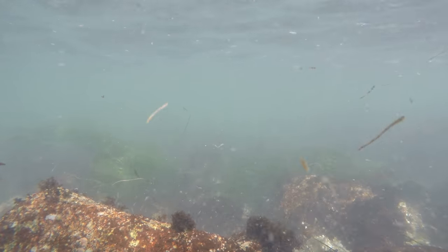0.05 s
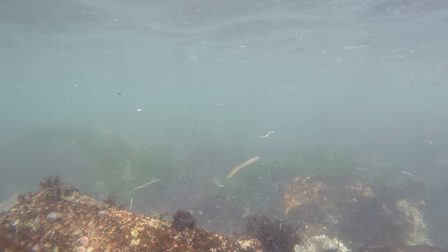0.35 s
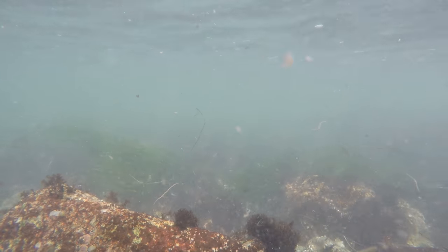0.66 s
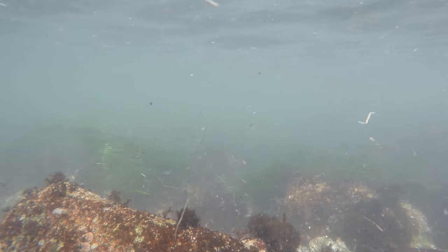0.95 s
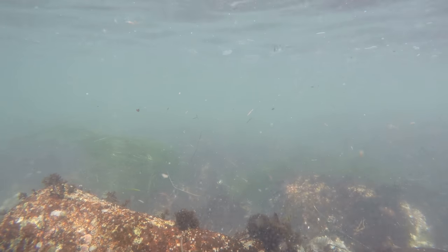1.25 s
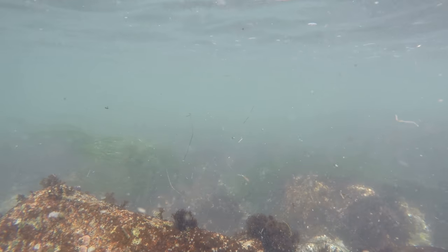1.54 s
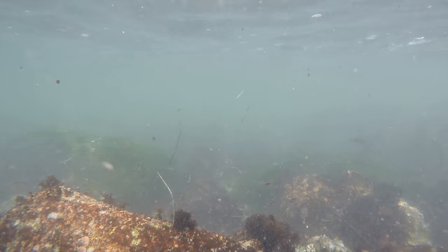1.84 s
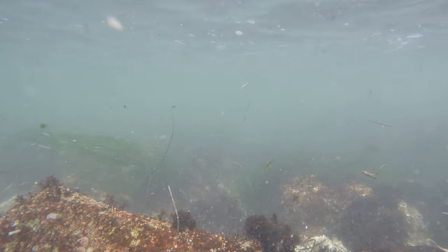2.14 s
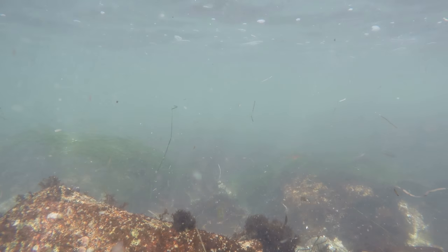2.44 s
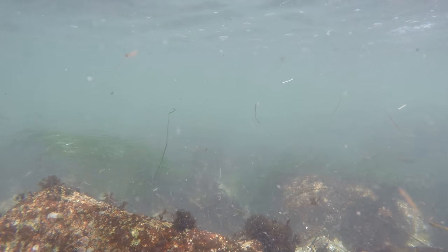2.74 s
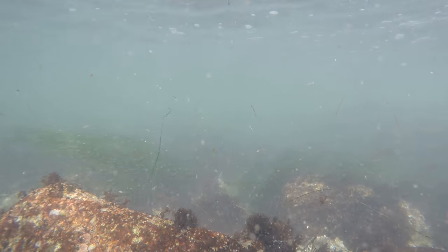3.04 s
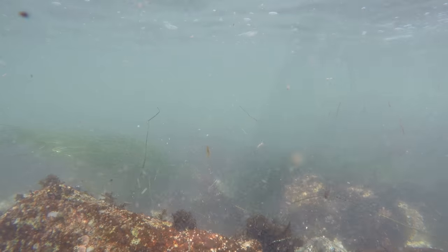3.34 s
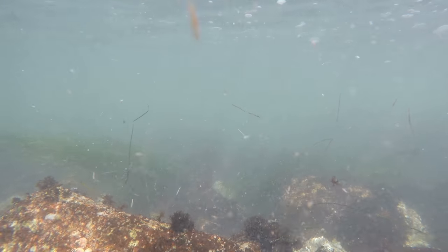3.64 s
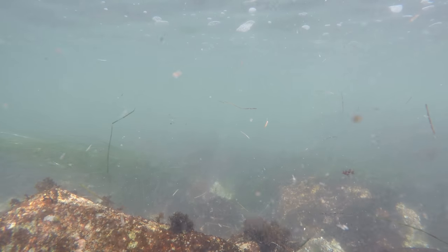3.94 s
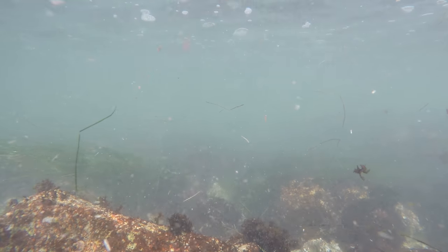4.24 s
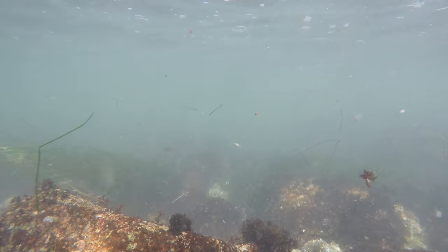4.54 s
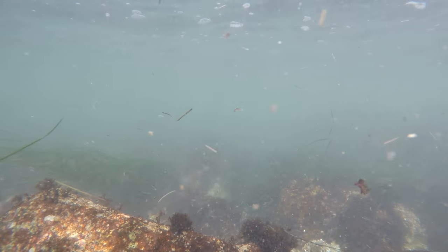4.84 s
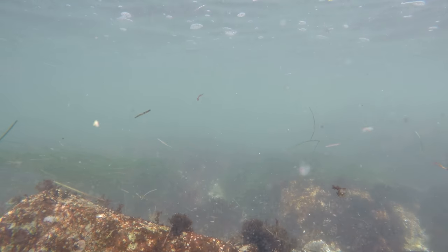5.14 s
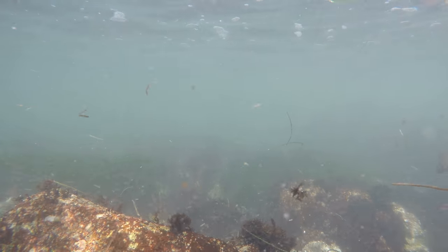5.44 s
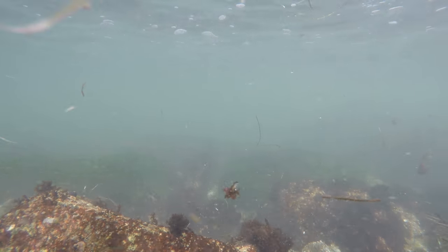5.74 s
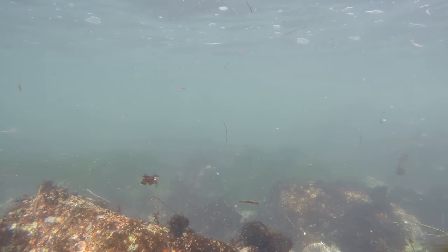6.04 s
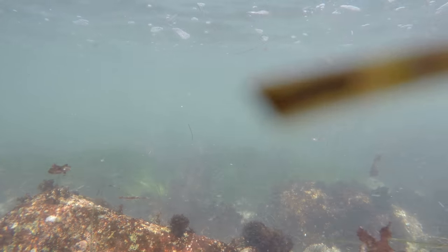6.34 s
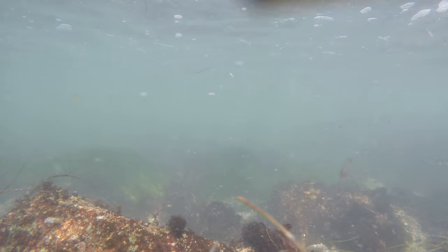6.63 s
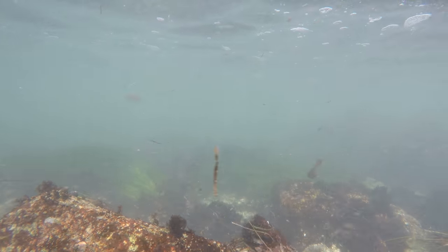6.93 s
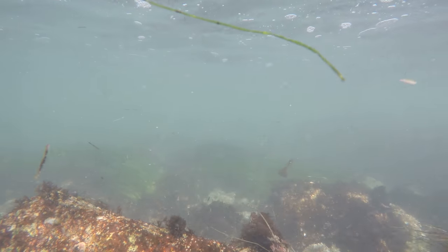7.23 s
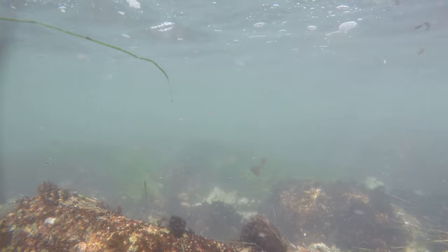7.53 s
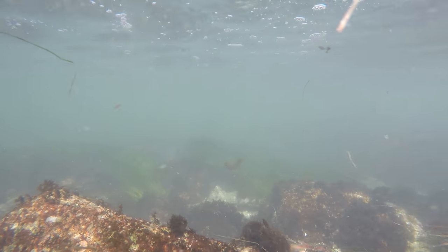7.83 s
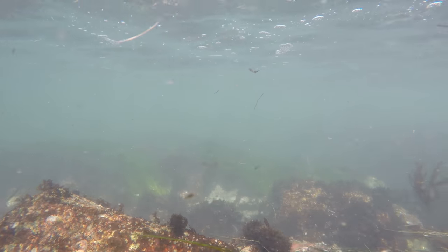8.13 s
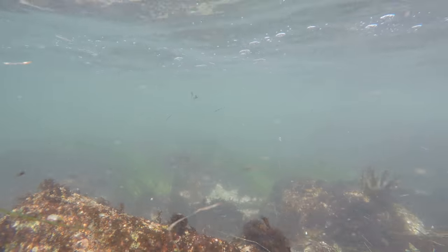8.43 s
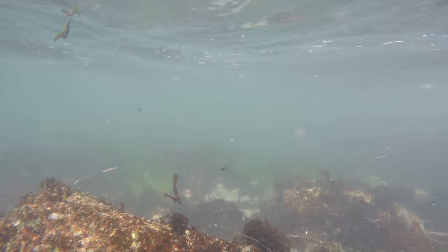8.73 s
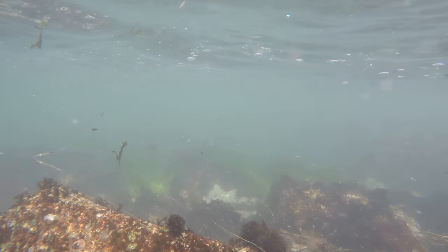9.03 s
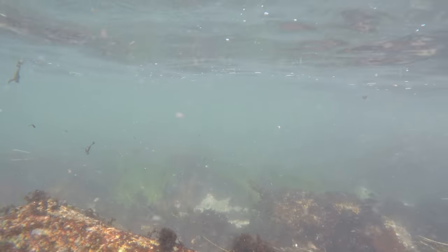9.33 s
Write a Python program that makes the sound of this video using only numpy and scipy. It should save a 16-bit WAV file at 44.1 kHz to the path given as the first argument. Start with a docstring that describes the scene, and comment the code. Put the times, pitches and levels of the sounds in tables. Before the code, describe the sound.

Low underwater surge rumbles with gurgling bubbles and faint ticks, ending in a heavy thud and splash.

```python
"""A camera in a waterproof housing lies just under the surf, above rocks and weed.
The surge rumbles from the start, and a cloud of air bubbles gurgles by, each ringing at the
pitch of its size. In the lull that follows, grit ticks on the housing, fronds brush it and a
faint cloud passes. A dense cloud arrives at 8.3 s; at 9.4 s the surface slaps down on the
housing with a heavy thud and a splash."""
import sys
import numpy as np
from scipy import signal
from scipy.fft import rfft, irfft, next_fast_len
from scipy.io import wavfile
from scipy.ndimage import uniform_filter1d, map_coordinates

SR = 44100
rng = np.random.default_rng(int(sys.argv[2]) if len(sys.argv) > 2 else 0)


def int16_out(signal):
    """Quantize to a 16-bit WAV file."""
    q = np.round(np.clip(np.atleast_2d(signal).T, -1, 1) * 32767)
    wavfile.write(sys.argv[1], SR, q.astype(np.int16))


N = 418068


def amp(db):
    """Decibels to gain."""
    return 10 ** (np.asarray(db) / 20)


def unit(x):
    """Scale to rms 1."""
    return x / np.sqrt(np.mean(x ** 2) + 1e-20)


def automation(points):
    """Straight ramps through (t/s, value) points, one value a sample."""
    return np.interp(np.arange(N) / SR, *np.transpose(points))


def wobble(rate):
    """A smooth random curve, rate knots a second."""
    return map_coordinates(rng.standard_normal(int(N * rate / SR) + 4), [np.arange(N) * rate / SR])


def swell(middle_s, length_s):
    """A smooth rise and fall from 0 to 1 and back."""
    return np.cos(np.pi * np.clip((np.arange(N) / SR - middle_s) / length_s, -.5, .5)) ** 2


def colour(x, eq):
    """Minimum-phase EQ through (f/Hz, level/dB) points, scaled to a power gain of 1."""
    size = 2 * next_fast_len(len(x) // 2 + 4096)
    hz, db = np.transpose(eq)
    log_hz = np.log(np.fft.rfftfreq(size, 1 / SR) + 1)
    gain = unit(amp(np.interp(log_hz, np.log(hz), db)))
    cepstrum = irfft(np.log(gain))
    cepstrum[1:size // 2] *= 2
    cepstrum[size // 2 + 1:] = 0
    return irfft(rfft(x, size) * np.exp(rfft(cepstrum)))[:len(x)]


def noise(eq):
    """Coloured noise of rms 1."""
    return unit(colour(rng.standard_normal(N), eq))


def steady(x, seconds):
    """Even out swells slower than the given time, leaving rms 1."""
    width = max(int(seconds * SR), 2)
    power = uniform_filter1d(uniform_filter1d(x ** 2, width), width)
    return x / np.sqrt(np.abs(power) + 1e-12)


def add(track, s, sound):
    """Mix a sound into a track at time s."""
    start = min(max(round(s * SR), 0), N)
    track[start:start + len(sound)] += sound[:N - start]


def ring(t, hz, t60, glide):
    """A resonance that swells over a cycle or two and bends by the share glide as it dies."""
    phase = 2 * np.pi * hz * (t + glide * (t - t60 / 6 * (1 - np.exp(-6 * t / t60))))
    attack = 1 - np.exp(-(.6 * hz * t) ** 2)
    return np.sin(phase) * attack * amp(-60 * t / t60)


def swarm(rate, centre_hz, spread, cycles, scatter_db, glide, samples):
    """Randomly timed little bubbles; the larger ones are lower and ring longer."""
    count = int(rate * N / SR)
    when, pitch, strength, life, drift = rng.random((count, 5)).T[:, :, None]
    hz = centre_hz * np.exp(spread * (2 * pitch - 1))
    tones = ring(np.arange(samples) / SR, hz, cycles * (.5 + life) / hz, glide * (3 * drift - 1))
    tones *= amp(scatter_db * strength ** 2)
    places = (when * N).astype(int) + np.arange(samples)
    return unit(np.bincount(places.ravel(), tones.ravel(), N)[:N])


def grit(rate, bed):
    """Random tiny impacts on a bed of finer ones."""
    impacts = (rng.random(N) < rate / SR) * rng.standard_normal(N)
    return unit(unit(impacts) + bed * rng.standard_normal(N))


def noise_floor():
    """An even hiss under the faint whine of the camera's electronics."""
    # hiss EQ: f/Hz, level/dB
    hiss_eq = [(100, 5), (300, 4.5), (700, -1.5), (1100, -3), (2700, -7), (3400, -5.5), (4000, -4.5),
               (5000, -7.5), (8000, -12.5), (11500, -14.5), (12400, -11), (13200, -16.5), (15500, -19)]
    # whine tones: f/Hz, rms level/dB
    tones = [(4016, -86.5), (12349, -91)]
    t = np.arange(N) / SR
    whine = sum(amp(db) * np.sqrt(2) * np.sin(2 * np.pi * hz * t + 0.91 * wobble(70))
                for hz, db in tones)
    return amp(-65.0) * noise(hiss_eq) + whine


def surge():
    """The flow and its eddies press on the housing; faster water adds a flutter above the rumble."""
    # slow flow past the housing: t/s, relative level/dB
    current = [(0.0, -44.5), (0.9, -46.5), (1.65, -43), (2.4, -46.5), (3.2, -44.5), (3.95, -45),
               (4.35, -38), (4.7, -46), (5.5, -42), (6.9, -43), (7.15, -42.5), (7.6, -45), (7.95, -39),
               (8.38, -42), (8.6, -37.5), (9.36, -37)]
    # eddies rolling past: middle t/s, relative peak level/dB
    eddies = [(0.17, -38.5), (0.3, -39.5), (0.57, -41.5), (1.25, -38), (1.38, -38), (1.57, -40),
              (2.56, -40), (3.099, -34), (3.71, -39), (4.17, -33.5), (5.34, -37.5), (5.7, -37), (5.96, -35),
              (6.19, -33), (6.39, -35), (6.68, -39), (7.0, -38.5), (7.73, -40.5), (7.91, -35), (8.64, -36),
              (9.03, -33.5), (9.17, -31.5)]
    # rumble EQ: f/Hz, level/dB
    rumble_eq = [(8, -26), (14, 4.5), (28, -0.5), (45, -0.5), (60, -10.5), (90, -22), (180, -34.5),
                 (400, -48.5), (900, -78)]
    eddy_power = sum((amp(db) * swell(s, length_s=0.14)) ** 2 for s, db in eddies)
    flow = np.sqrt(amp(automation(current)) ** 2 + eddy_power)
    rumble = steady(noise(rumble_eq), seconds=0.049)
    flutter = noise([(40, -17), (110, 7.5), (200, -2.5), (400, -23.5), (900, -44)]) * amp(2 * wobble(27))
    return amp(1.28) * flow * rumble + amp(-54.5) * np.sqrt(flow) * flutter


def weed():
    """Drifting fronds rub along the housing in short uneven strokes."""
    # brush strokes: t/s, length/s, level/dB
    brushes = [(2.021, 0.051, -61.5), (2.755, 0.048, -61), (4.52, 0.21, -65.5), (5.285, 0.089, -66),
               (5.675, 0.34, -70), (6.127, 0.12, -61), (6.654, 0.41, -63.5), (7.048, 0.15, -61),
               (7.86, 0.14, -68.5)]
    # scrape EQ: f/Hz, level/dB
    scrape_eq = [(150, -20), (500, -8), (660, 7), (760, 2.5), (900, -11.5), (1250, -3), (1900, -19),
                 (2700, -10), (4200, -34), (9000, -43)]
    strokes = np.zeros(N)
    for s, length, db in brushes:
        add(strokes, s, amp(db) * signal.windows.tukey(max(int(length * SR), 8), .5))
    grip = amp(3 * wobble(90))
    return strokes * unit(colour(grit(rate=630, bed=0.3) * grip, scrape_eq))


def ticks():
    """A grain gives a crack around its own pitch, a short rattle and a hollow knock of the housing."""
    # grit hits, and two short bubble plops (0.3586 s, 0.4174 s) sounded the same way: t/s, relative level/dB,
    # knock offset/dB, crack centre f/Hz
    hits = [(0.2329, -33, 0, 1200), (0.3586, -37.5, 1.5, 1470), (0.4174, -38.5, 6.5, 1000),
            (1.2274, -42, 4, 1210), (1.4654, -33, -38, 2920), (1.871, -39.5, -11, 1400),
            (2.0638, -40.5, -21, 4230), (2.323, -43, -32, 3770), (2.784, -44, -28, 1160),
            (3.0515, -42, -14, 4200), (3.266, -40, -25, 1760), (3.3206, -42, -23, 2430),
            (4.5917, -53.5, 5.5, 1400), (4.627, -51, 2, 1600), (5.357, -46, 6.5, 1690),
            (5.4846, -47.5, 4, 1210), (5.54, -53, 7, 1200), (5.59, -30.5, -8.5, 1110),
            (5.6124, -44, -23, 2700), (5.6337, -44.5, -17, 1870), (6.715, -43.5, -9, 2800),
            (6.8074, -58, 8, 1170), (6.9084, -54, 3, 1000), (7.0614, -42, -4, 1260),
            (7.2788, -41.5, -15, 3180), (7.3178, -44, -4.5, 1420), (7.358, -36, -40, 3220),
            (9.1328, -34, -12, 1650)]
    # crack EQ: f/Hz, level/dB
    crack_eq = [(200, 9.5), (900, -1), (1500, 0.5), (2800, 2), (4200, 3.5), (5500, 1.5), (8500, -2),
                (15000, -4)]
    cracks, knocks, t = np.zeros(N), np.zeros(N), np.arange(SR // 16) / SR
    decay = amp(-60 * t / 0.012) + amp(-16) * amp(-60 * t / 0.043)  # snap, then rattle
    for s, db, knock_db, hz in hits:
        band = signal.butter(1, [0.78 * hz, 1.18 * hz], "band", fs=SR, output="sos")
        crack = decay * unit(signal.sosfilt(band, rng.standard_normal(len(t))))
        add(cracks, s + 0.00102, amp(db - 8.0) * crack)
        add(knocks, s, amp(db + knock_db + 4.5) * ring(t, hz=713, t60=0.028, glide=-0.11))
    return colour(cracks, crack_eq) + knocks


def cloud_envelopes():
    """Gains of patter and fizz: each cloud of air arrives quickly, stays a while and thins out."""
    # passing clouds: arrival t/s, hold/s, patter level/dB, fizz level/dB, fade/(dB per s)
    clouds = [(0.203, 0.11, -57.5, -62.5, 9), (5.146, 0.39, -69, -75, 9), (8.29, 1.3, -58, -58, 10)]
    # dense bursts of fine bubbles: middle t/s, length/s, fizz level/dB
    bursts = [(0.05, 0.64, -65.5), (0.533, 0.47, -61), (1.034, 0.34, -58.5), (1.35, 0.34, -64.5),
              (8.49, 0.46, -49.5)]
    t, rise_s = np.arange(N) / SR, 0.017
    patter_power, fizz_power = amp(-76) ** 2, amp(-75.5) ** 2  # calm water
    for s, hold, patter_db, fizz_db, fade_rate in clouds:
        near = np.clip((t - s) / rise_s, 0, 1) * amp(-fade_rate * np.maximum(t - s - hold, 0))
        approach = amp(-7 - 25 * np.abs(t - s)) * (t < s)
        patter_power += (amp(patter_db) * (near + approach)) ** 2
        fizz_power += (amp(fizz_db) * near) ** 2
    fizz_power += sum((amp(db) * swell(s, length)) ** 2 for s, length, db in bursts)
    return np.sqrt(patter_power), np.sqrt(fizz_power)


def churn():
    """Grit patters through the housing's hollow resonance; a cloud adds wash, gurgles, fizz and pings."""
    # hollow patter EQ: f/Hz, level/dB
    patter_eq = [(100, -2), (250, -10), (450, -5), (600, -3), (690, 3), (800, 1.5), (930, -11.5),
                 (1250, -15.5), (2600, -23.5), (5000, -35.5)]
    # low wash EQ: f/Hz, level/dB
    wash_eq = [(40, -8), (70, 6), (110, 8), (200, -13.5), (330, -18), (450, -17), (700, -25), (2000, -40)]
    # fizz EQ: f/Hz, level/dB
    fizz_eq = [(500, -12.5), (1000, -2), (1350, -17), (1600, -2), (2100, -8.5), (2800, -2.5), (3050, -12),
               (3300, -3), (3600, -27), (3900, -7), (4600, -13.5), (7000, -36), (8500, -33), (10000, -41),
               (15000, -41)]
    patter_gain, fizz_gain = cloud_envelopes()
    gate_db, floor_db = -65.5, -81  # gurgle and wash open up only in the stronger clouds
    gurgle_gain = np.sqrt(np.maximum(patter_gain ** 2 - amp(gate_db) ** 2, amp(floor_db) ** 2))
    patter = unit(colour(grit(rate=500, bed=0.39), patter_eq))
    wash = noise(wash_eq) * amp(3 * wobble(7.3))
    gurgle = swarm(rate=90, centre_hz=659, spread=0.342, cycles=42.4,
                   scatter_db=-6.5, glide=0.244, samples=3600)
    small = swarm(rate=700, centre_hz=2282, spread=0.641, cycles=43.5,
                  scatter_db=15, glide=-0.12, samples=1500)
    crackle = unit(rng.standard_normal(N) * amp(5.9 * wobble(140)))
    fizz = unit(colour(small + amp(-4.5) * crackle, fizz_eq))
    pings = swarm(rate=120, centre_hz=8860, spread=0.53, cycles=24,
                  scatter_db=30, glide=-0.013, samples=1100)
    strays = swarm(rate=25, centre_hz=2150, spread=0.42, cycles=52,
                   scatter_db=11, glide=-0.06, samples=2000)
    lows = amp(0.5) * patter_gain * patter + gurgle_gain * (amp(1.5) * gurgle + wash)
    highs = fizz_gain * (amp(2.5) * fizz + amp(-18) * pings)
    return lows + highs + amp(-80.5) * strays  # a few bubbles ring even in the calm


def spurt():
    """The first big bubble breaks up into a short spurt of fine ones."""
    start_s, rise_s, t60 = 0.234, 0.003, 0.12
    age = np.maximum(np.arange(N) / SR - start_s, 0)
    fine = swarm(rate=470, centre_hz=4170, spread=0.34, cycles=44,
                 scatter_db=12, glide=-0.1, samples=900)
    return (1 - np.exp(-age / rise_s)) * amp(-53.5 - 60 * age / t60) * fine


def bubbles():
    """Each bubble pinches off with a soft puff and rings at the pitch of its size; the rocks scatter it."""
    # single bubbles: t/s, f/Hz, relative level/dB, glide/share of pitch
    pinch_offs = [(0.1453, 644, -41, .11), (0.2319, 738, -36, -0.014), (0.235, 1140, -43, 0.18),
                  (0.243, 713, -33.5, -0.13), (0.2662, 2550, -37, 0.18), (0.3177, 2410, -24, -0.014),
                  (0.455, 1565, -41.5, -0.042), (0.485, 1550, -42.5, -0.014), (0.497, 4020, -37, -0.069),
                  (0.5088, 578, -43, 0.32), (0.5294, 2300, -40, -0.035), (0.5676, 1500, -42.5, 0),
                  (0.6483, 2800, -40.5, -0.012), (0.7163, 1690, -39.5, -0.12), (0.7484, 2970, -39.5, -0.11),
                  (0.841, 2950, -43, -.03), (0.8696, 760, -45.5, 0), (0.958, 486, -45, 0.29),
                  (0.969, 4020, -34.5, -0.084), (0.9809, 594, -37, 0.23), (0.9993, 672, -40, 0.3),
                  (1.03, 1380, -42, .29), (1.0293, 2630, -34, -0.064), (1.0519, 1564, -25, .12),
                  (1.06, 2800, -38.5, 0.069), (1.075, 2450, -38, -0.025), (1.1, 1570, -33, 0),
                  (1.1814, 5770, -41.5, -0.024), (1.1956, 655, -48, 0.089), (1.207, 1740, -43, -.03),
                  (1.2278, 824, -46.5, 0.26), (1.3645, 2150, -49, .16), (1.396, 2110, -47, -0.047),
                  (1.4126, 440, -57, -0.14), (1.6304, 2714, -43, 0.018), (1.788, 1740, -48, 0.012),
                  (2.9263, 1540, -55, -.05), (2.949, 401, -59, 0), (3.3552, 1800, -32, -0.018),
                  (3.427, 2500, -53, -0.042), (4.115, 2590, -53.5, -.05), (4.2908, 2600, -52, -0.069),
                  (5.1525, 1690, -52, 0.0077), (5.2428, 2300, -50, 0.07), (5.4226, 2840, -39.5, -0.06),
                  (6.1059, 1490, -53.5, -0.071), (8.267, 1530, -46.5, 0.037), (8.2787, 864, -42.5, -0.02),
                  (8.282, 2680, -30, -0.137), (8.34, 1620, -39, 0.25), (8.401, 1743, -22, -0.12),
                  (8.4105, 619, -37, -0.148), (8.4133, 8560, -40.5, 0), (8.4293, 557, -38.5, -0.0051),
                  (8.4407, 8440, -46, .06), (8.4897, 2130, -27.5, -0.1), (8.5056, 1850, -36, 0.092),
                  (8.5308, 652, -38, -0.32), (8.7073, 556, -43, -0.084), (8.718, 3190, -38, 0.11),
                  (8.7701, 725, -38, -0.31), (8.814, 560, -29.5, -0.044), (8.8985, 1700, -41, -.09),
                  (8.958, 1610, -40.5, 0.043), (8.9649, 883, -44.5, -0.038), (9.0684, 615, -38.5, 0.034),
                  (9.0823, 2090, -38.5, -0.068), (9.0915, 662, -41, -0.03), (9.135, 1518, -31.5, .15),
                  (9.1703, 665, -39.5, -0.016), (9.3047, 692, -32, 0.14), (9.315, 714, -33, -0.008)]
    typical_cycles, typical_db, typical_hz = 84, -38, 1500  # cycles to fall by 60 dB
    track, t = np.zeros(N), np.arange(SR // 4) / SR
    for s, hz, db, glide in pinch_offs:
        # strongly driven bubbles and small ones lose more per cycle
        cycles = typical_cycles * amp(db - typical_db) ** -0.16 * (hz / typical_hz) ** -0.18
        tone = ring(t, hz, cycles / hz, glide)
        scatter = rng.standard_normal(len(t)) * amp(-60 * t / 0.067) * (t > .004)
        echo = signal.fftconvolve(tone, scatter / np.linalg.norm(scatter))[:len(t)]
        lowpass = signal.butter(4, hz, fs=SR, output="sos")
        puff = unit(signal.sosfilt(lowpass, rng.standard_normal(len(t)))) * amp(-60 * t * hz / 16)
        wet = amp(-14) * np.sqrt(typical_hz / hz)  # low notes carry further, so more comes back
        add(track, s, amp(db + 1.5) * (tone + wet * echo + amp(-13.5) * puff))
    return track


def breaker():
    """The surface falls on the housing: a trapped air pocket booms, water buffets and slaps."""
    # water slaps: t/s, level/dB, t60/s
    hits = [(9.3827, -31, 0.047), (9.391, -23.5, 0.049), (9.4109, -8, 0.023), (9.421, -24.5, 0.073),
            (9.429, -12.5, 0.042), (9.4363, -16.5, 0.036), (9.451, -16, 0.03), (9.463, -26, 0.064)]
    # splash EQ: f/Hz, level/dB
    splash_eq = [(100, -13), (400, -3), (660, 12.5), (950, -5), (1500, -3), (1900, -5.5), (2600, -2),
                 (3200, -15), (3900, -25), (6000, -34.5), (8000, -45), (15000, -57)]
    # weight of the breaking surface: t/s, buffet level/dB
    plunge = [(9.37, -77), (9.388, -36), (9.4, -11), (9.43, -18.5), (9.445, -17.5), (9.48, -21.5)]
    boom, slaps, t = np.zeros(N), np.zeros(N), np.arange(SR // 4) / SR
    attack = 1 - np.exp(-(t / 0.0011) ** 2)
    pocket = np.cos(2 * np.pi * 46 * t) * amp(-60 * t / 0.12) * attack
    add(boom, 9.4005, amp(4.5) * pocket)
    for s, db, t60 in hits:
        add(slaps, s, amp(db) * amp(-60 * t / t60) * rng.standard_normal(len(t)))
    weight = amp(automation(plunge))
    buffet_eq = [(30, -24), (70, 5.5), (130, 0.5), (250, -8.0), (450, -15.0), (900, -33), (2500, -72)]
    buffet = (weight - weight[0]) * steady(noise(buffet_eq), seconds=0.013)  # silent until the plunge
    return boom + colour(slaps, splash_eq) + buffet


def scene():
    """Everything reaches one microphone inside the housing."""
    return (surge() + churn() + weed() + bubbles() + spurt() + ticks() + breaker() + noise_floor())[None]


def record(dry):
    """The camera soft-clips overloads and keeps nothing above its band limit."""
    ceiling, top_hz = .95, 15400
    clipped = dry / (1 + np.abs(dry / ceiling) ** 6) ** (1 / 6)
    size = next_fast_len(N + SR // 2)
    padded = np.pad(clipped, ((0, 0), (0, size - N)), "linear_ramp")
    passband = np.fft.rfftfreq(size, 1 / SR) < top_hz
    return irfft(rfft(padded) * passband, size)[:, :N]


dry = scene()
out = record(dry)
int16_out(out)
```